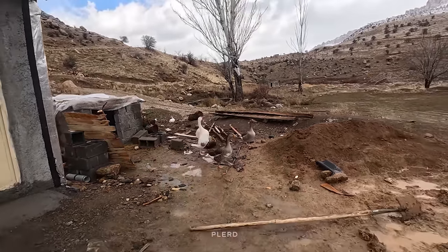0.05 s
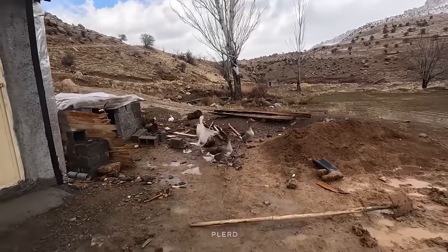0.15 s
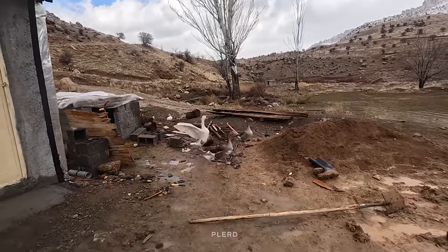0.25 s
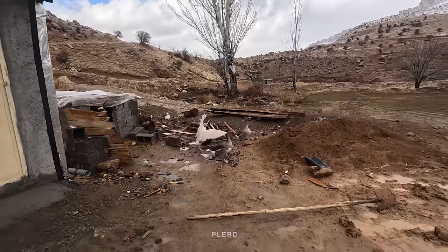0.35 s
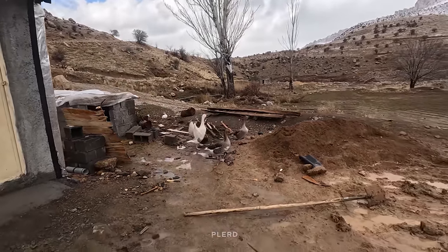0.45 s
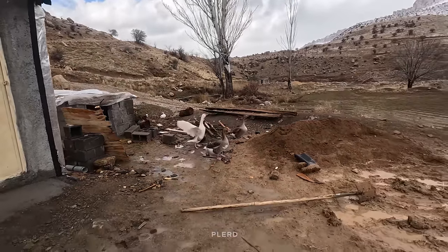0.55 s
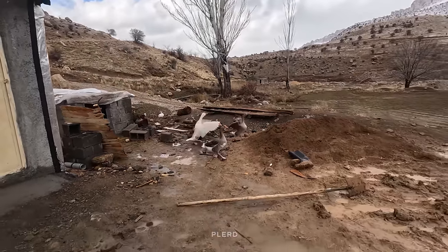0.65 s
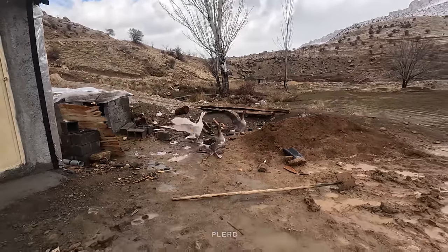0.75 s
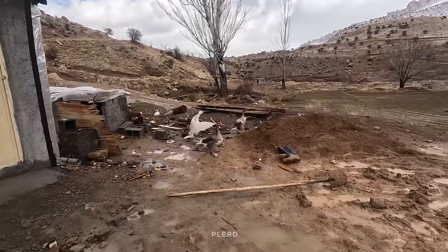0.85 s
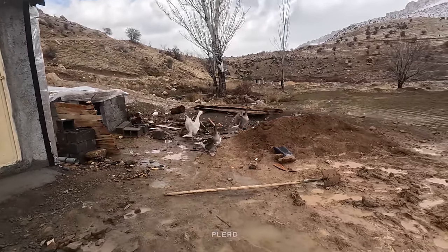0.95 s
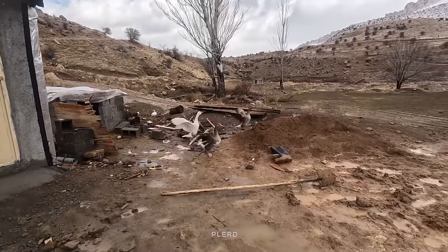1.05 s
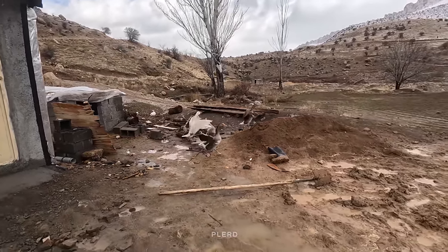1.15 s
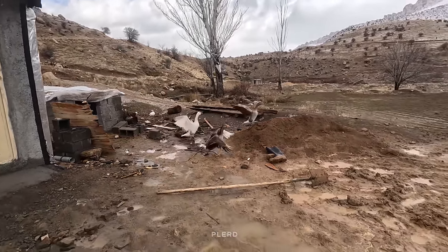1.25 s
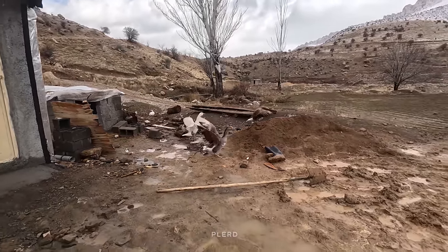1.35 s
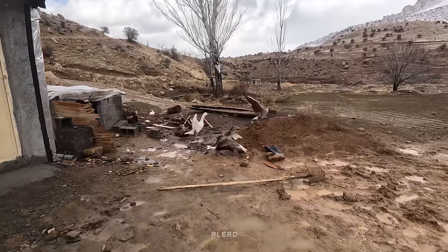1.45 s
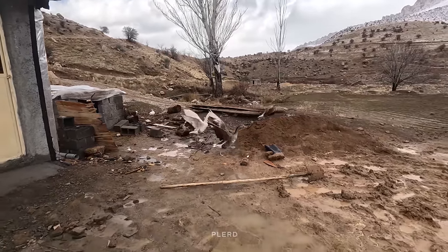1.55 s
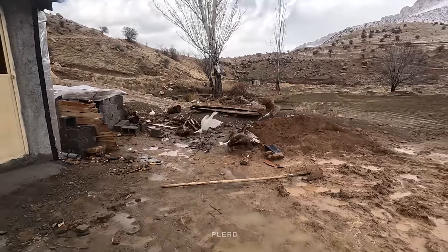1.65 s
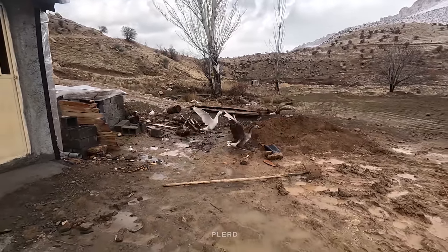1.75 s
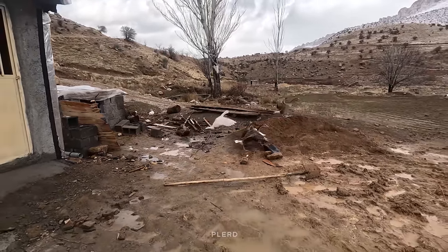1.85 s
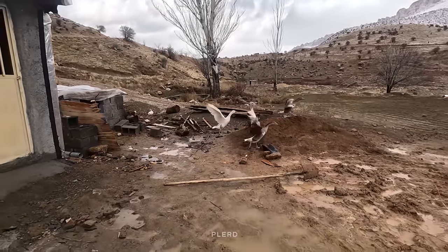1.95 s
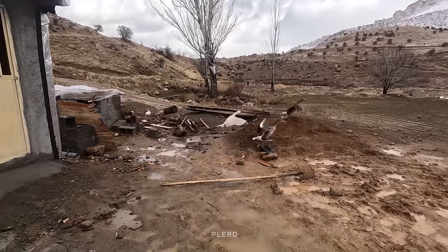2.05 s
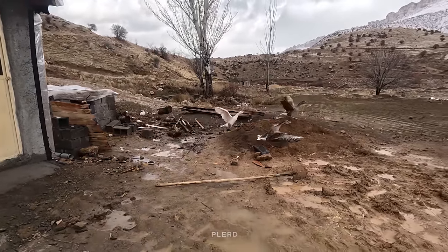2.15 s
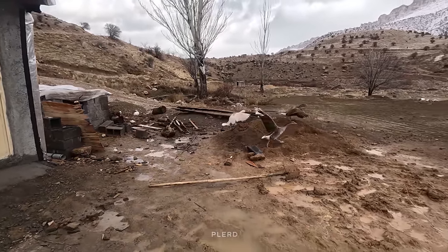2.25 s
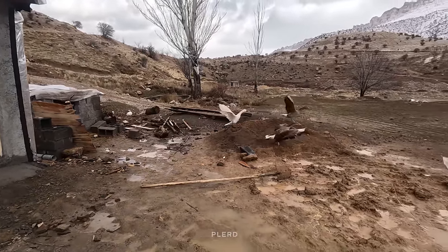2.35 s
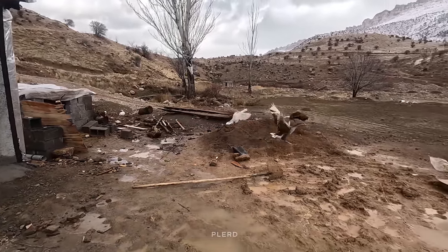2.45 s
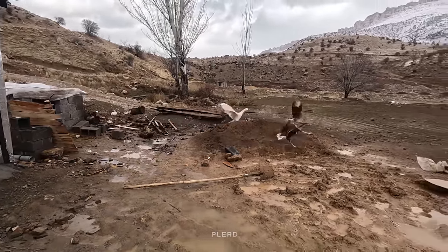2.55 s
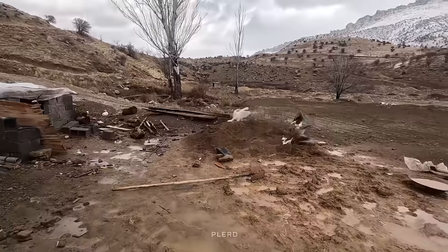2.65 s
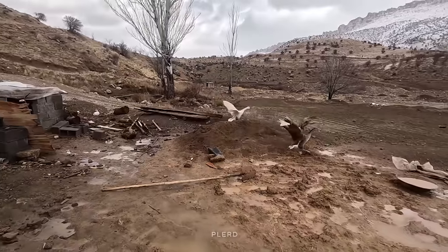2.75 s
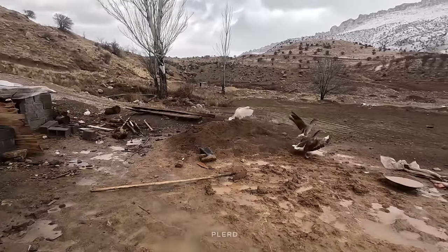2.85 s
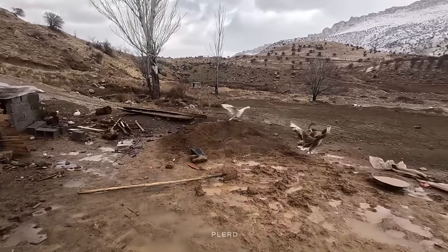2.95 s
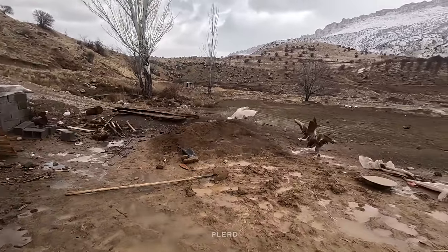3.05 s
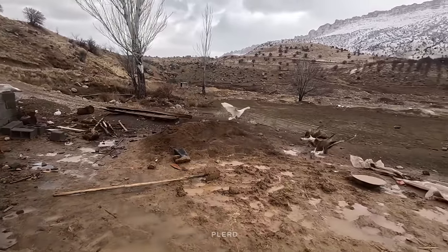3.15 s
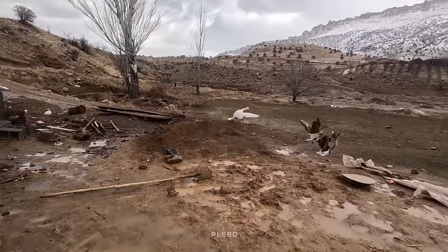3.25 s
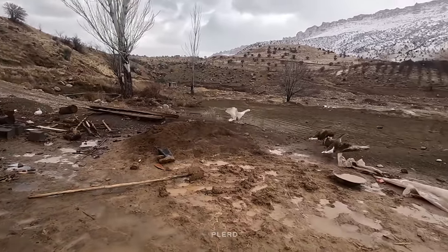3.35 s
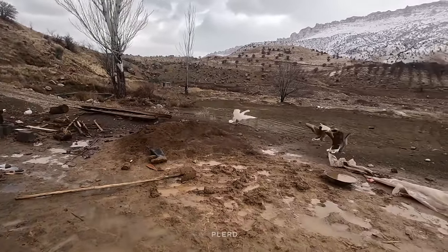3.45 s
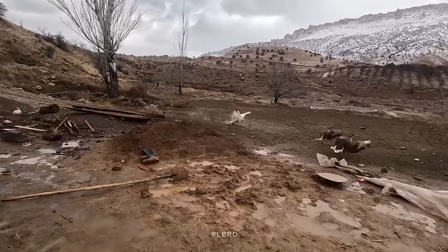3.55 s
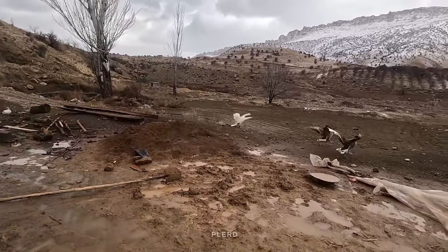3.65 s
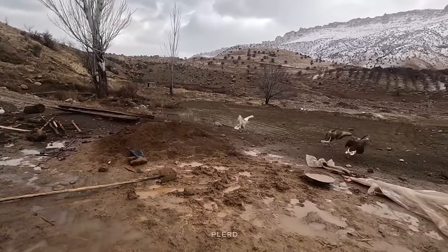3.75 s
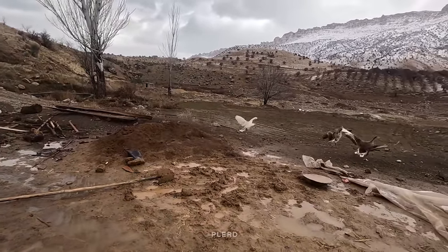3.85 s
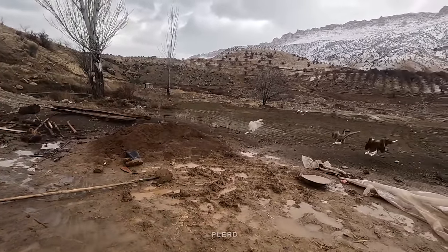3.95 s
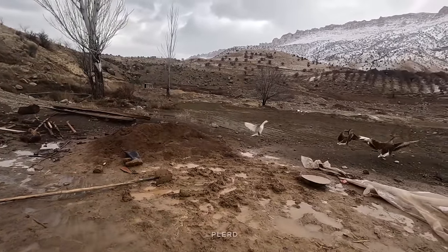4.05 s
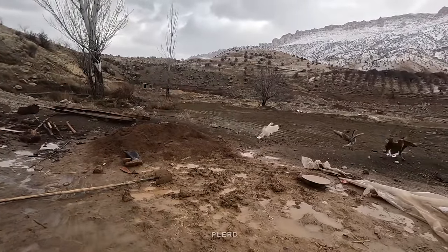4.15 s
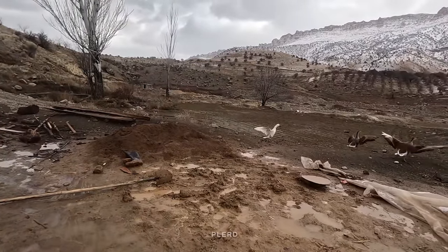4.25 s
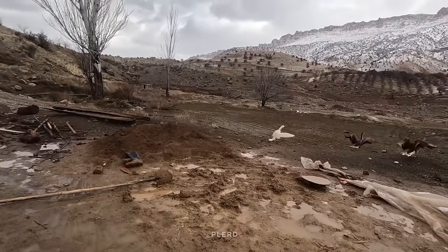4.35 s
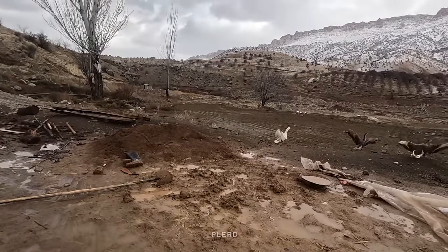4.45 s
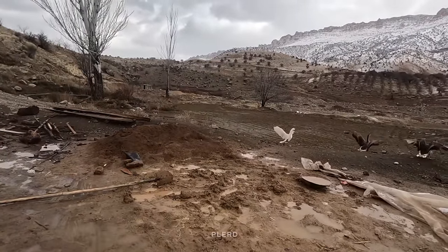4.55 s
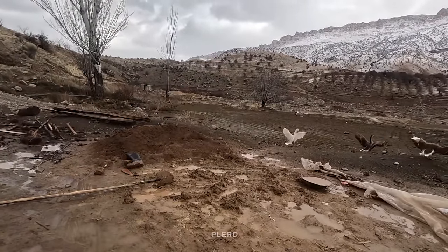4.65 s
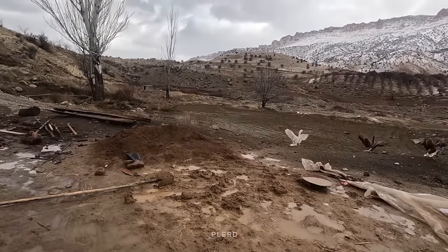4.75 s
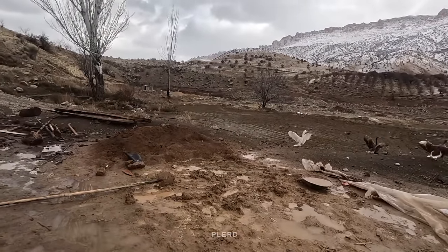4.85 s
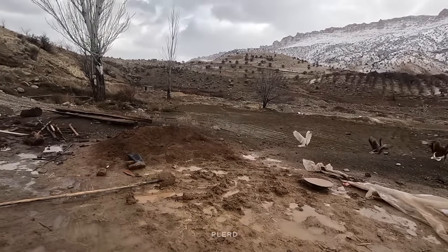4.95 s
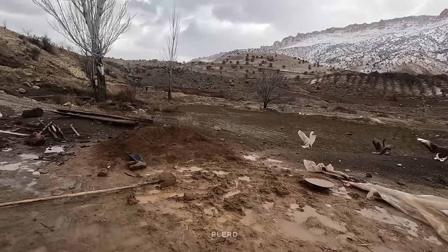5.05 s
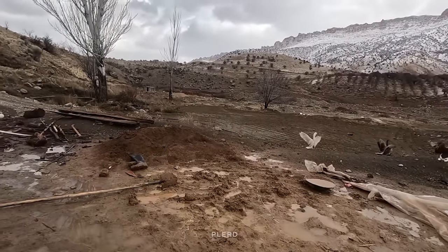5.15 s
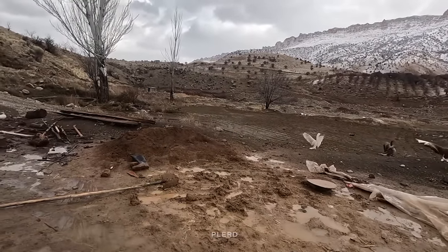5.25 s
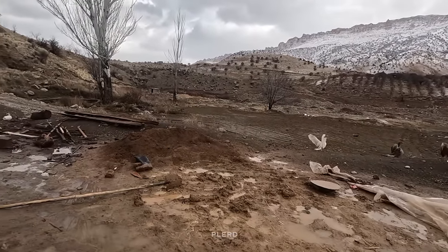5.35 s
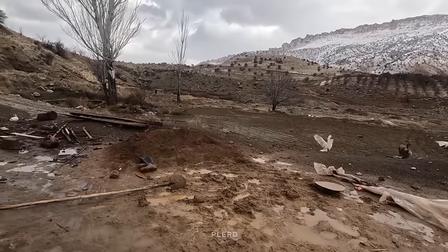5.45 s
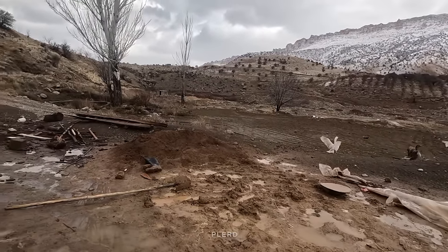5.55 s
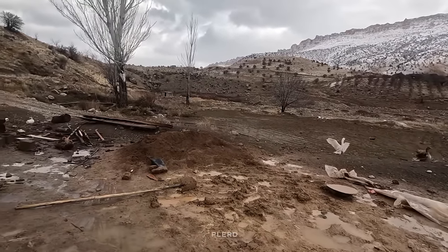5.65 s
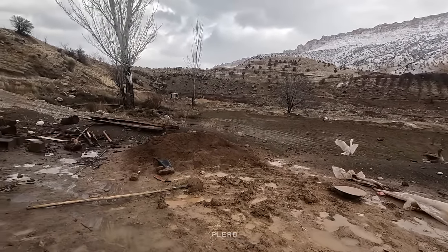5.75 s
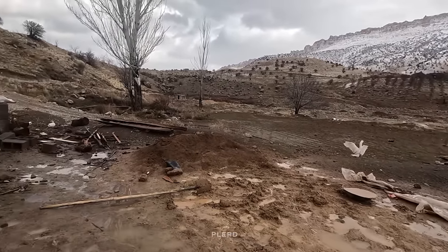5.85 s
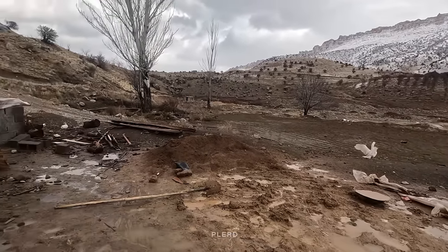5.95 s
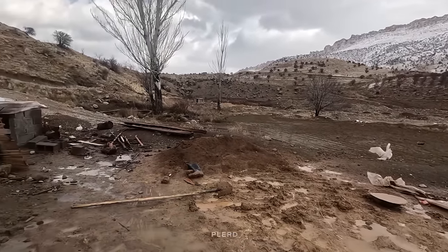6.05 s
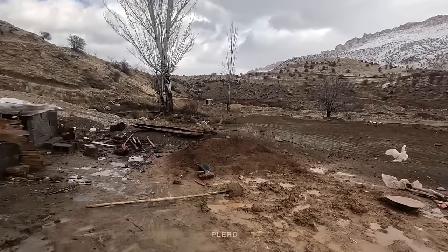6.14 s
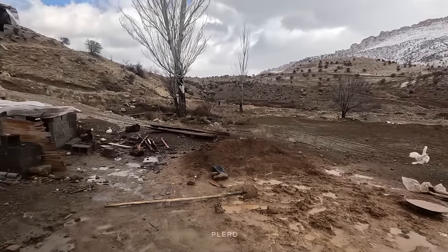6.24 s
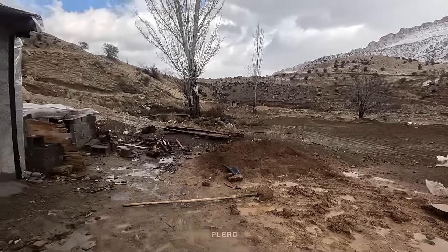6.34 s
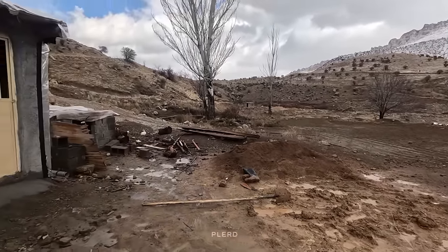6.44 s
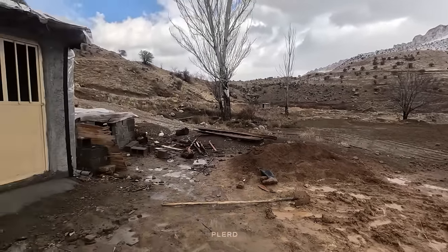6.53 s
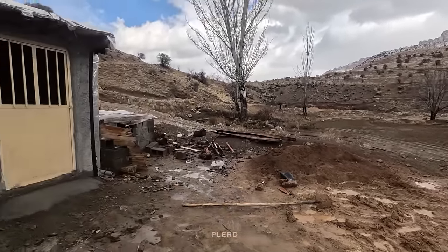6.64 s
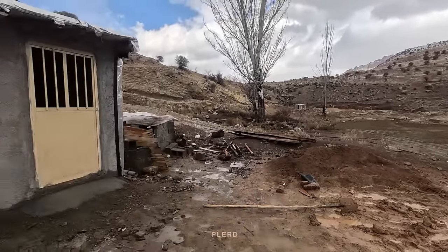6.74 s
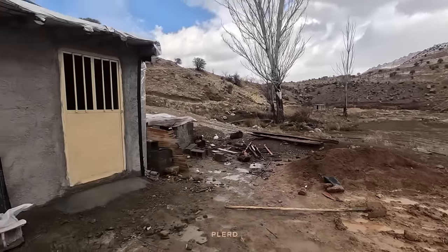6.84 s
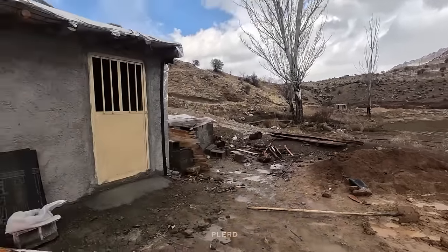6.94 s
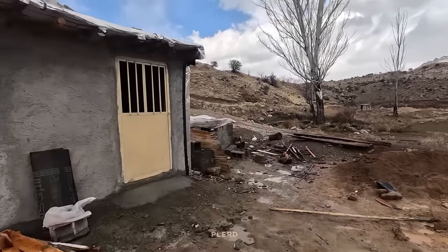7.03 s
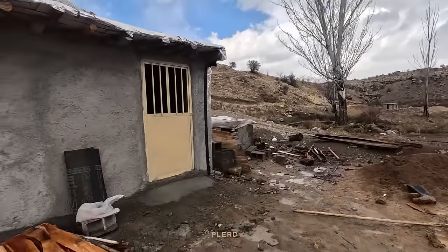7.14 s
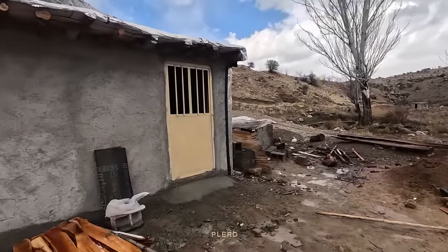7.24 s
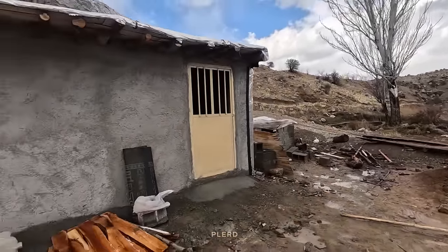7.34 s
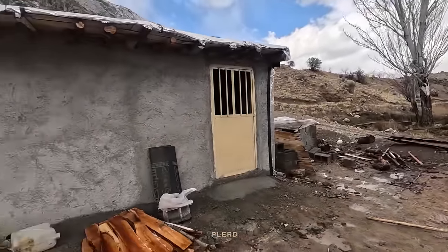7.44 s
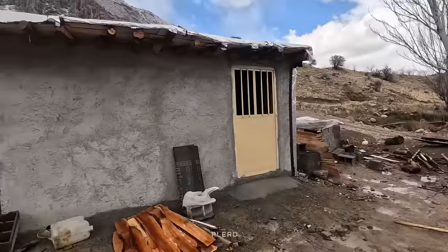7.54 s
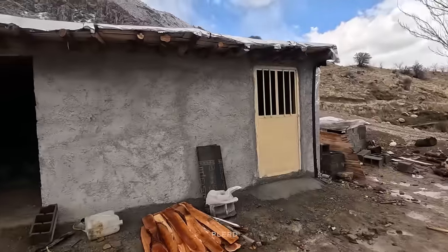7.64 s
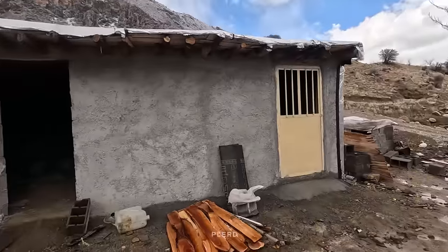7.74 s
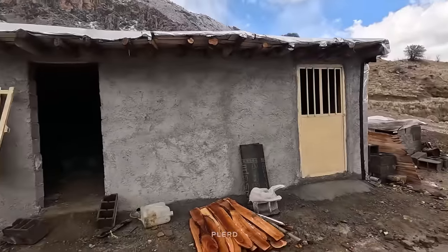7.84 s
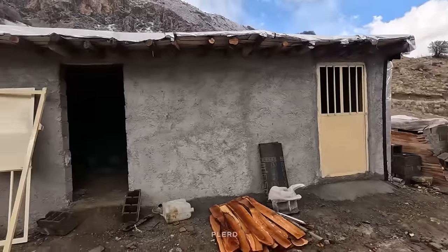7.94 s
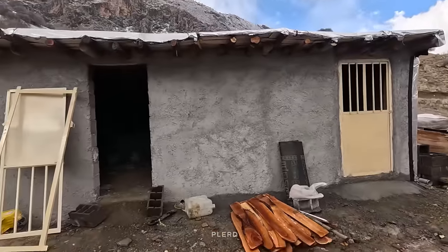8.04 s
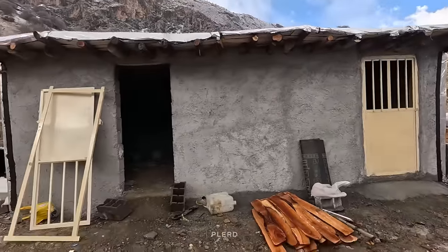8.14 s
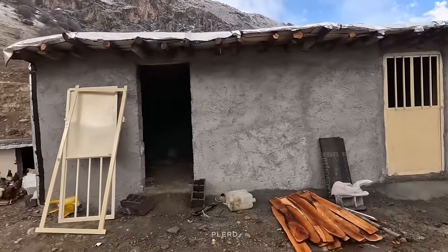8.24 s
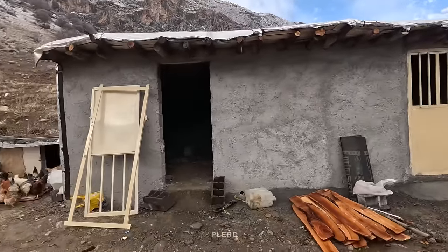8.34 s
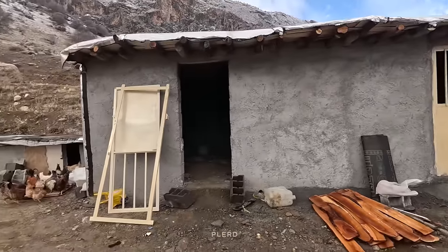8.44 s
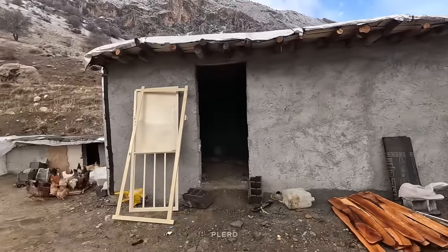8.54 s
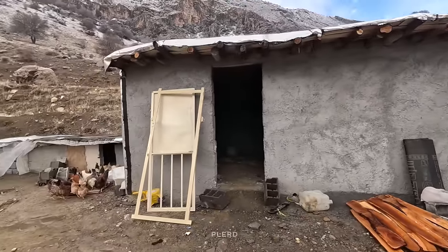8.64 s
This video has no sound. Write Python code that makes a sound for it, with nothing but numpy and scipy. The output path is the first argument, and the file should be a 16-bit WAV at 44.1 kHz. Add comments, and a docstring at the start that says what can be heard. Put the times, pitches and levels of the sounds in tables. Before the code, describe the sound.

In a farmyard, several geese call over one another with short, buzzy honks, now and then breaking into a brief squeal. They gradually sound farther off, leaving weaker, more echoing honks and a faint hen cackle. Low wind rumble comes and goes on the microphone and ends in a thumping buffet, while small ticks of grit and cloth sound over a faint hiss.

```python
"""Geese honk over one another as they run and flap across a muddy farmyard.
Each honk is a buzzing membrane plus breath, ringing through the windpipe and the open bill.
Now and then a bird breaks into a squeal, and a hen cackles faintly near the end.
Wind buffets the microphone, grit and cloth tick nearby, and a wall throws the calls back."""
import sys
import numpy as np
from scipy import signal
from scipy.fft import rfft, irfft
from scipy.io import wavfile
from scipy.ndimage import uniform_filter1d

SR = 44100
rng = np.random.default_rng(int(sys.argv[2]) if len(sys.argv) > 2 else 0)


def wav_record(signal):
    """Record a signal, one row per channel, as 16-bit PCM in the file named by sys.argv[1]."""
    frames = np.transpose(np.atleast_2d(signal))
    bounded = np.clip(frames, -1, 1)
    # unit amplitude maps onto the largest positive 16-bit level
    quanta = np.round(bounded * 32767).astype(np.int16)
    wavfile.write(sys.argv[1], SR, quanta)


N = 383229

# Goose honks. Each row: start and length in seconds, level in dB, swell from early to late in dB,
# pitch in Hz, roughness from 0 to 1, throat ring in Hz, bill ring in Hz, bill level over throat in dB.
HONKS = [(0.179, 0.094, -34, 1, 139, 0.43, 1010, 2050, -9.5),
         (0.276, 0.094, -31.5, 3, 170, 0.31, 940, 2630, -8),
         (0.408, 0.15, -33, -2, 162.5, 0.25, 892, 2480, -10),
         (0.494, .17, -29, -5, 235.8, 0.31, 1040, 3740, -18.5),
         (0.621, 0.096, -27, 0, 185.9, 0.31, 964, 2520, -14.5),
         (0.723, .11, -25, -2, 227.1, 0.32, 1060, 3550, -16.5),
         (0.81, 0.17, -26, -3.5, 191.6, 0.41, 1093, 2460, -12.5),
         (0.919, 0.11, -25.5, 1, 163.8, 0.44, 1203, 2870, -5.5),
         (0.996, 0.085, -29, -6, 194.5, 0.58, 1197, 2390, -10),
         (1.146, .1, -26, -2.5, 177.9, 0.52, 1106, 3200, -13.5),
         (1.245, 0.11, -28.5, -2, 166, 0.31, 910, 1840, -4),
         (1.33, 0.14, -25.5, -2, 203, 0.29, 1227, 2615, -7),
         (1.416, .12, -26, -2.5, 181, 0.14, 956, 2010, -7),
         (1.597, .13, -23.5, 3.5, 184.4, 0.31, 1017, 1980, -9),
         (1.694, .12, -28.5, -1, 211.8, 0.39, 1154, 3610, -9.5),
         (1.777, 0.075, -32, 3, 225, .3, 1070, 4000, 0),
         (1.84, 0.097, -22.5, 2, 238.3, 0.3, 947, 2590, -10.5),
         (1.908, .12, -25.5, -3, 180.3, .48, 1087, 2760, -13),
         (2.048, 0.099, -26, -0.5, 235.8, 0.3, 988, 2900, -9.5),
         (2.224, 0.075, -32.5, 5.5, 210, 0.47, 1170, 2710, -4.5),
         (2.374, 0.093, -23.5, 3.5, 236.8, 0.41, 983, 3680, -8),
         (2.434, 0.21, -25, -1, 242, 0.33, 1206, 1980, -4),
         (2.629, 0.15, -26.5, -1.5, 207.9, 0.42, 1205, 2700, -6.5),
         (2.761, .14, -27, 0, 229.5, 0.85, 1093, 1980, -8.5),
         (2.86, .14, -33, -3.5, 207.2, 0.31, 1180, 2740, -3.5),
         (3.068, .08, -28.5, -1, 180.4, 0.31, 990, 2140, -13),
         (3.155, .14, -26.5, 0, 195.4, 0.49, 1264, 3830, -14),
         (3.264, 0.084, -26, .5, 195.7, 0.55, 1080, 2920, -7.5),
         (3.4, 0.11, -26.5, 1, 190, 0.3, 1024, 1950, -14),
         (3.469, 0.072, -30, -1, 212, 0.53, 1120, 2680, -3),
         (3.654, 0.092, -33, -3, 179, .55, 1180, 2790, -3.5),
         (3.754, 0.09, -26.5, -1, 194.5, 0.27, 1002, 1990, -11.5),
         (3.842, 0.12, -31, 0.5, 216, 0.47, 1238, 2790, -5),
         (3.942, 0.1, -27, -0.5, 189.9, .18, 994, 2050, -12),
         (4.06, 0.094, -29, -1.5, 216.7, 0.25, 1366, 2920, -3.5),
         (4.215, 0.13, -28.5, -4.5, 217.6, 0.34, 1260, 2200, -11.5),
         (4.314, .12, -25.5, -1.5, 239.9, 0.27, 1025, 1790, -11.5),
         (4.477, .19, -29, 0, 216.8, 0.25, 1178, 2730, -6),
         (4.716, .13, -30.5, .5, 193.6, 0.31, 1158, 2000, -12),
         (4.81, .14, -29.5, 0, 212.1, 0.31, 1336, 3050, -12.5),
         (5.093, 0.089, -29.5, 9, 185.5, 0.29, 1036, 3100, -9.5),
         (5.15, .11, -30, -2, 204, 0.31, 1327, 3030, -14.5),
         (5.308, .12, -30.5, -.5, 182.2, 0.5, 1040, 2050, -13.5),
         (5.599, 0.099, -30.5, -2.5, 200.5, .45, 1124, 2530, -15.5),
         (6.528, .17, -33.5, -1.5, 160.6, 0.5, 1257, 2610, -10.5),
         (6.735, 0.08, -46, -5.5, 243.7, 0.34, 960, 3090, -13),
         (6.834, 0.064, -49, 5, 245.4, 0.7, 880, 2870, -9),
         (6.954, .15, -44.5, 2.5, 221, 0.72, 984, 2011, -15),
         (7.144, 0.085, -39.5, 0, 152.3, .7, 1025, 2800, -5.5),
         (7.23, .18, -37, -4, 156, 0.4, 1075, 2990, -16.5),
         (7.418, 0.16, -38.5, -2, 149, 0.42, 1050, 2000, -16),
         (7.639, .16, -46, 0.5, 201, 0.44, 906, 1640, -10),
         (7.833, .11, -44, 0, 201, 0.84, 1040, 2000, -17),
         (7.931, 0.1, -45.5, 3, 167.6, 0.73, 1140, 1700, -3),
         (8.039, 0.07, -38.5, -0.5, 185.8, 0.61, 1150, 2700, -10.5)]
# Three squeals, a list each, and the hen's cackle. Each row: time in seconds, pitch in Hz, level in dB.
SQUEALS = [
    [(1.815, 1385, -24.5), (1.857, 1373, -14.5), (1.89, 1380, -41)],
    [(4.028, 1670, -35), (4.045, 1630, -18), (4.07, 1606, -41)],
    [(7.122, 1520, -49), (7.15, 1444, -28), (7.18, 1480, -50)],
]
CACKLE = [(7.9, 766, -81), (7.925, 827, -48), (7.96, 879, -48), (8.0, 926, -57), (8.02, 900, -60)]
# The tones (partials) in those calls. Each row: multiple of the pitch, level in dB.
SQUEAL_PARTIALS = [(1, -24.5), (2, -7), (3, -11.5), (4, -17), (5, -17), (6, -24), (7, -18), (8, -54),
                   (9, -41)]
CACKLE_PARTIALS = [(1, -2), (2, -2.5), (3, -11), (4, -5), (5, -31)]
# One row per squeal: tremble as a share of the pitch, dB added per partial above the second.
SQUEAL_MANNER = [(.006, 0), (.035, -12), (.035, -12)]
# Ticks of grit and cloth. Each row: start in seconds, level in dB, centre in Hz.
TICKS = [(0.0936, -17.5, 3270), (0.5548, -28, 3770), (1.567, -30, 2230), (5.034, -46, 3180),
         (6.268, -53, 6400), (7.707, -40, 2980), (7.7433, -38, 6700), (8.288, -41.5, 2500),
         (8.417, -36, 2250)]
# How long the echo lasts. Each row: frequency in Hz, seconds to fade by 60 dB.
ECHO_FADE = [(500, 0.33), (1200, 0.31), (3000, 0.42), (8000, 0.39)]
# Wind on the microphone. Each row: time in seconds, rumble level in dB.
WIND_LEVELS = [(0.0, -35.5), (0.51, -53), (0.58, -29.5), (0.7, -41.5), (0.8, -28.5), (1.57, -38.5),
               (1.72, -53.5), (2.2, -35), (2.22, -39.5), (2.78, -33.5), (2.88, -48.5), (3.05, -32.5),
               (3.32, -47.5), (5.03, -62), (5.49, -43.5), (5.74, -56.5), (6.12, -41.5), (6.58, -52),
               (6.68, -41), (6.75, -52), (7.19, -51.5), (7.26, -22.5), (7.45, -49), (7.89, -29),
               (7.96, -40.5), (8.15, -22), (8.2, -23), (8.28, -24), (8.54, -58), (8.69, -54)]
# Sharp buffets of wind. Each row: time of the peak in seconds, level in dB, half length in seconds.
BUFFETS = [(1.106, -26.5, 0.005), (1.227, -33, 0.0064), (1.332, -33, 0.0075), (2.7, -43, 0.014),
           (2.782, -43.5, .017), (7.283, -46, 0.028), (7.874, -38, 0.014), (8.149, -35.5, 0.017),
           (8.231, -19.5, 0.02)]
# The tone of the wind's rumble, its flutter and the far hiss. Each row: frequency in Hz, level in dB.
RUMBLE_TONE = [(14, -31), (28, 2.5), (45, 0.5), (80, -2), (130, -10), (200, -18), (300, -44.5),
               (900, -92.5)]
FLUTTER_TONE = [(90, -33.5), (160, 4), (260, -6), (400, -15.5), (700, -21), (1100, -41.5), (2500, -88)]
HISS_TONE = [(100, -4.5), (150, -2.5), (300, -12.5), (600, -17), (1200, -13.5), (2200, -23), (3600, -29),
             (5000, -38.5), (7800, -30), (12000, -43)]
# How alike the hiss is left and right. Each row: frequency in Hz, likeness from 0 to 1.
HISS_LIKENESS = [(250, 1), (1000, 0.72), (4000, 0.6)]
# The microphone's two openings sit a little apart. Each row: frequency in Hz, left's lead in radians.
LEFT_LEAD = [(300, 0), (1100, -.25), (3100, -.8), (5000, -.3), (9200, 0)]
# The microphone's tone. Each row: frequency in Hz, gain in dB.
MICROPHONE_TONE = [(7500, 3.5), (8600, -3), (9500, -19), (11500, -18.5), (13000, -13)]

RASP_DB, RASP_PER_BILL_DB, RASP_PER_LEVEL_DB, LOUD_CALL_DB = -13, 0.93, 0.32, -27
RANDOM_SLIDE, END_DROP = .012, .05  # shares of the pitch; it drops as the breath runs out
ECHO_NEAR_DB, ECHO_FAR_DB = -16, -7.5  # the echo's share grows as the birds run off
HISS_DB, TREBLE_LIMIT_HZ = -52.5, 14800


def honk(length, level_db, swell_db, pitch_hz, rough, throat_hz, bill_hz, bill_db):
    """A buzzing membrane and puffs of breath ring through the windpipe and bill, with a raspy top."""
    n = int(length * SR)
    progress = np.arange(n) / n
    effort = .16 - (2 * progress - 1) ** 2  # rises, then sags
    late = (progress - .5) / .4  # negative early in the call, positive late
    jitter = .12 * rough ** 2 * drift(n, .003) + .005 * drift(n, .02)
    glide = RANDOM_SLIDE * rng.standard_normal() * late - END_DROP * progress ** 5
    hz = pitch_hz * (1 + glide) * (1 + 0.0798 * effort) * (1 + jitter)
    cycles = np.cumsum(hz) / SR + rng.random()
    multiples = np.arange(2, 45)[:, None]
    phases = 2 * np.pi * multiples * cycles + .9 * rng.standard_normal(multiples.shape)
    partials = np.exp(1j * phases) * gain_of(1.5 * drift(n, .004))
    breath = (0.36 + np.exp(-(cycles % 1) / .5)) * rng.standard_normal(n)  # one puff per cycle
    mouth = 1 + .08 * effort + .025 * drift(n, .03)  # the bill opens and shuts, moving the peaks
    detune = rng.uniform(0.858, 1.122, 9)

    def voiced(breath_share, peaks, breath_band):
        """Partials ring at the moving peaks; breath fills the peaks and a wider band."""
        buzz = (partials * peaks(multiples * hz / mouth)).real.sum(0)
        air = filtered(breath, lambda f: peaks(f) + breath_band(f))
        return np.sqrt(1 - breath_share) * unit_level(buzz) + np.sqrt(breath_share) * unit_level(air)

    def throat_peaks(f):
        """The windpipe's main ring; deeper birds reach lower."""
        band = 1 / (1 + (3.79 * pitch_hz / (f + 1)) ** 8) / (1 + (f / 1550) ** 8)
        return band * (ring(f, throat_hz, 280) + 0.34 * ring(f, 1100, 800))

    def overtones(f, numbers):
        """The windpipe's higher rings."""
        return sum((-1) ** j * ring(f, j * throat_hz * detune[j], 110 * j) / j for j in numbers)

    def bill_peaks(f):
        """A shrill call rings hard at the bill; a dull one spreads over the overtones."""
        return 1.5 * gain_of(bill_db / 2) * ring(f, bill_hz, 400) + .7 * overtones(f, (2, 3, 4))

    throat = voiced(rough ** 2, throat_peaks, lambda f: 0.086 * ring(f, 1000, 600))
    bill = voiced(rough ** 1.1, bill_peaks, lambda f: .6 * ring(f, 2900, 2400))
    rasp = voiced(rough ** 0.1, lambda f: overtones(f, (5, 6, 7, 8)),
                  lambda f: 0.017 * ring(f, 4700, 3100))
    # The rasp grows with a shrill bill; faint, far calls lose it.
    rasp_db = RASP_DB + RASP_PER_BILL_DB * bill_db + RASP_PER_LEVEL_DB * min(level_db - LOUD_CALL_DB, 0)
    chest = gain_of(-17.5) * np.sin(2 * np.pi * cycles)  # the lowest tone leaves through the body
    t, remaining = progress * length, (1 - progress) * length
    low = (throat + chest) * np.clip(t / 0.016, 0, 1) * np.clip(remaining / 0.031, 0, 1)
    treble = gain_of(bill_db) * bill + gain_of(rasp_db + 3.6 * effort) * rasp
    treble *= gain_of(2.07 * drift(n, 0.018) + 3 * (1 - progress))
    treble *= np.clip(t / 0.00084, 0, 1) * np.clip(remaining / 0.034, 0, 1)  # starts and fades first
    return (low + treble) * np.sin(np.pi * progress) ** 0.19 * gain_of(level_db + swell_db * late)


def squeal(curve, partials, tremble, tilt_db=0):
    """A squeal or cackle: a few clean partials on one gliding, trembling pitch."""
    times, hz, level_db = np.transpose(curve)
    t = np.arange(times[0], times[-1], 1 / SR)
    pitch_hz = np.interp(t, times, hz) * (1 + tremble * drift(len(t), 0.0032))
    cycles = np.cumsum(pitch_hz) / SR
    tone = sum(gain_of(db + tilt_db * max(k - 2, 0)) * np.sin(2 * np.pi * k * cycles + k * k)
               for k, db in partials)
    return np.sqrt(2) * tone * gain_of(np.interp(t, times, level_db)) * signal.windows.tukey(len(t), .2)


def flock():
    """All the birds' calls, with the honks a little to the right."""
    mix = np.zeros((2, N))
    for start, *call in HONKS:
        add(mix, start, honk(*call), left_db=rng.normal(-1.5, .6))
    for curve, manner in zip(SQUEALS, SQUEAL_MANNER):
        add(mix, curve[0][0], squeal(curve, SQUEAL_PARTIALS, *manner), left_db=0.5)
    add(mix, CACKLE[0][0], squeal(CACKLE, CACKLE_PARTIALS, tremble=0.039), left_db=-0.8)
    return mix


def ticks():
    """Grit and cloth tick: short bursts of noise that die quickly."""
    mix, t = np.zeros((2, N)), np.arange(4000) / SR
    for start, db, centre_hz in TICKS:
        burst = unit_level(filtered(rng.standard_normal(len(t)), lambda f: ring(f, centre_hz, 4200)))
        envelope = gain_of(db - 12.5 - 60 * t / 0.084) * (1 - np.exp(-t / 0.00028))
        add(mix, start, burst * envelope, left_db=-.8)
    return mix


def echo(sound):
    """Wall and hillside throw the sound back as many small, fading copies."""
    bounces = np.zeros((2, SR // 2))
    delays = np.arange(400, SR // 2 - 20, 20) + rng.integers(0, 20, (2, (SR // 2 - 401) // 20))
    np.put_along_axis(bounces, delays, rng.choice([-1., 1.], delays.shape), 1)
    hz, t, spectrum = signal.stft(bounces, SR, nperseg=256)
    fade = gain_of(-60 * t / look_up(ECHO_FADE, hz)[:, None])
    tail = signal.istft(spectrum * fade, SR, nperseg=256)[1]
    return signal.fftconvolve(sound.mean(0)[None], tail / np.linalg.norm(tail[0]), axes=1)[:, :N]


def wind():
    """Lumpy pressure swings rumble on the microphone; a faster flutter leaps up in lumps and buffets."""
    t, lumps = np.arange(N) / SR, drift(N, .02)
    level_db = np.interp(t, *np.transpose(WIND_LEVELS))
    shared, per_side = rng.standard_normal((2, N)), rng.standard_normal((2, 2, N))
    noise = (shared[:, None] + 0.34 * per_side) * gain_of([[-2.6], [2.6]])  # stronger on the right
    rumble = unit_level(filtered(noise[0], lambda f: gain_of(look_up(RUMBLE_TONE, f))))
    rumble *= gain_of(level_db + 1.1 * lumps + 1.54 * drift(N, 0.052))
    flutter = unit_level(filtered(noise[1], lambda f: gain_of(look_up(FLUTTER_TONE, f))))
    flutter *= gain_of([[-1.5], [1.5]])
    buffets = sum(gain_of(db) * np.exp(-((t - peak) / half) ** 2) for peak, db, half in BUFFETS)
    return rumble + (gain_of(level_db - 17.5 + 4.5 * lumps) + buffets) * flutter


def far_hiss():
    """Wind hisses over the far hills in drifting patches, with a rustle on top."""
    frames, hz = N // 128 + 5, np.fft.rfftfreq(512, 1 / SR)
    a, b, c, d, patches = rng.standard_normal((frames, 257, 5)).T
    patches = unit_level(uniform_filter1d(uniform_filter1d(patches, 10, 0), 20, 1))
    likeness = look_up(HISS_LIKENESS, hz)[:, None]
    left = a + 1j * b
    right = likeness * left + np.sqrt(1 - likeness ** 2) * (c + 1j * d)
    # Scurrying feet and wings draw away; cloth and grit flicker in the treble.
    receding = np.outer(np.clip(hz / 3000, 0, 1), np.linspace(6.0, -5.0, frames))
    rustle = np.outer(np.clip(hz / 7000, 0, 1), drift(N, 0.0068)[np.arange(frames) * 127])
    shape_db = look_up(HISS_TONE, hz)[:, None] + 2.0 * patches + 1.6 * rustle + receding
    hiss = signal.istft(np.array([left, right]) * gain_of(shape_db), nperseg=512, noverlap=384)[1]
    return gain_of(HISS_DB) * unit_level(hiss[:, :N])


def gain_of(db):
    """Turns dB into a multiplier."""
    return 10 ** (np.asarray(db) / 20)


def unit_level(x):
    """Scales a signal to an average (rms) level of 1."""
    return x / np.sqrt(np.mean(x ** 2) + 1e-20)


def look_up(table, hz):
    """Reads between the rows of a frequency table."""
    f, value = np.transpose(table)
    return np.interp(np.log(hz + 1), np.log(f + 1), value)


def add(mix, start, sound, left_db):
    """Lays a sound into both channels, louder on the left by left_db."""
    part = mix[:, round(start * SR):][:, :len(sound)]
    part += gain_of([[left_db / 2], [-left_db / 2]]) * sound[:part.shape[1]]


def filtered(x, response):
    """Filters by a function of frequency."""
    n = x.shape[-1]
    return irfft(rfft(x) * response(np.fft.rfftfreq(n, 1 / SR)), n)


def drift(n, seconds):
    """A random wander that changes over the given time."""
    width = int(seconds * SR)
    return unit_level(uniform_filter1d(uniform_filter1d(rng.standard_normal(n), width), width))


def ring(hz, centre_hz, width_hz):
    """A steep resonance: favours frequencies near its centre."""
    return 1 / (1 + 2j * (hz - centre_hz) / width_hz) ** 2


def scene():
    """Birds and ticks with their echo, over wind and far hiss."""
    near = filtered(flock() + ticks(), lambda f: np.exp(.5j * np.outer([1, -1], look_up(LEFT_LEAD, f))))
    echo_share = gain_of(np.linspace(ECHO_NEAR_DB, ECHO_FAR_DB, N))
    return near + echo(near * echo_share) + wind() + far_hiss()


def record(dry):
    """The microphone dulls the sound above the rasp, and the highest treble is cut off."""
    coloured = filtered(dry, lambda f: gain_of(look_up(MICROPHONE_TONE, f)))
    low_pass = signal.firwin(511, TREBLE_LIMIT_HZ, window=("kaiser", 9), fs=SR)
    return signal.oaconvolve(coloured, low_pass[None], "same")


dry = scene()
out = record(dry)
wav_record(out)
```